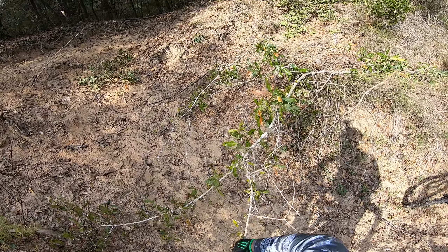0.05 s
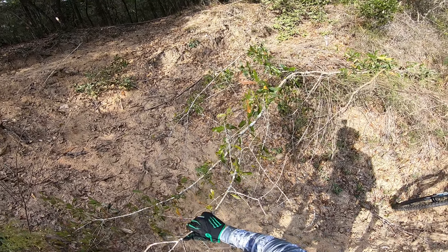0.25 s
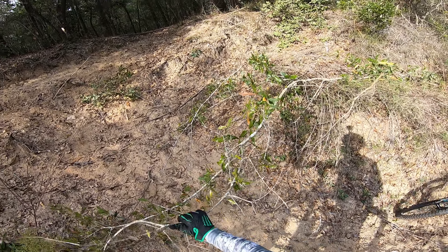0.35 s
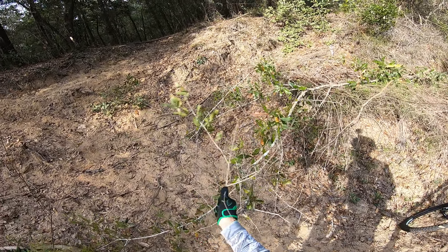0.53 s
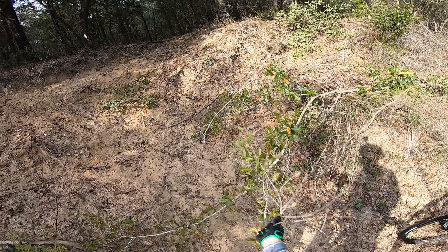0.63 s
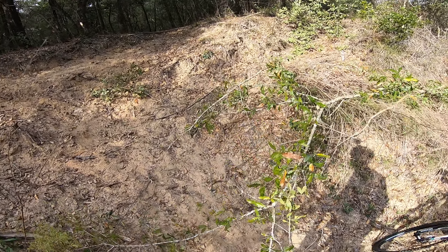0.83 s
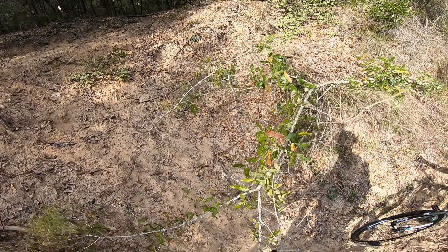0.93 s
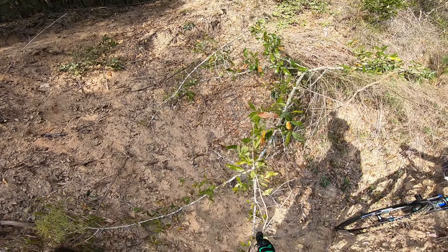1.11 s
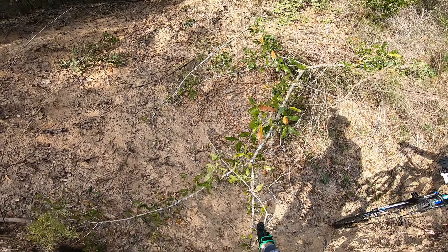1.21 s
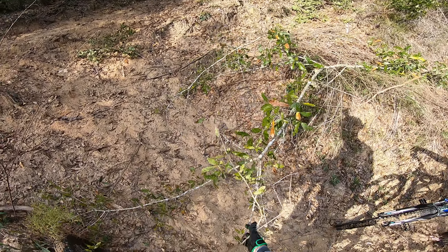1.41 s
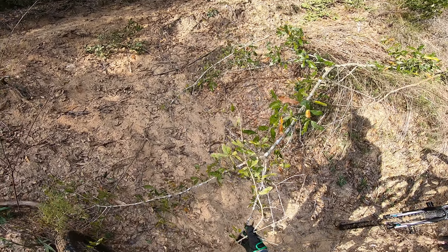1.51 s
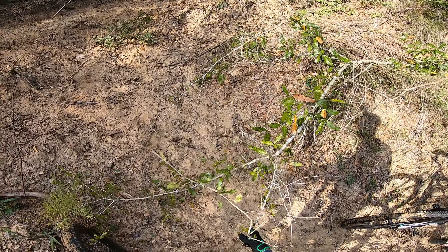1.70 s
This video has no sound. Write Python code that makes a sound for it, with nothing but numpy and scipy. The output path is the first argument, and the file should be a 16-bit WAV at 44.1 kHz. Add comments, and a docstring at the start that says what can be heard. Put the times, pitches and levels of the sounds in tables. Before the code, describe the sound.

A leafy branch rustles and crackles over dry dirt, with twigs snapping close by.

```python
"""A puff of wind and a dry rustle come first; then twigs snap and wood knocks and scuffs as a leafy
branch is swung, dropped and dragged over dry dirt, close to a body-worn camera outdoors.
Many tiny impacts add up to the crackle of leaves and grit; fractures and blows excite damped modes
of the wood. The microphone ports resonate near 7 kHz and give the leaves their edge, while eddies
of wind rumble, mostly in the right port."""
import sys
import numpy as np
from scipy import signal
from scipy.fft import rfft, irfft, next_fast_len
from scipy.io import wavfile
from scipy.ndimage import uniform_filter1d, map_coordinates

SR = 44100
rng = np.random.default_rng(int(sys.argv[2]) if len(sys.argv) > 2 else 0)


def wav_out(sig):
    """Save sig, one row per channel (or a flat mono array), as 16-bit PCM at SR to the path in sys.argv[1]."""
    wavfile.write(sys.argv[1], SR, np.round(np.clip(np.atleast_2d(sig).T, -1, 1) * 32767).astype(np.int16))


N = 77175
T = np.arange(N) / SR

# Envelope of the leaf rustle (time [s], level [dB])
RUSTLE_LEVEL = [(0, -53.5), (.13, -53), (.16, -44.5), (.23, -48), (.29, -47.5), (.37, -50), (.42, -44.5),
                (.45, -52), (.51, -48.5), (.57, -54.5), (.645, -50.5), (.665, -41), (.745, -46),
                (.83, -43.5), (.91, -44), (.97, -49), (1.005, -47), (1.04, -52), (1.08, -53), (1.11, -46.5),
                (1.14, -45.5), (1.165, -50.5), (1.205, -47), (1.3, -51.5), (1.4, -52.5), (1.46, -56.5),
                (1.51, -50), (1.58, -59.5), (1.75, -57.5)]
# Balance of the branch, always left minus right (time [s], balance [dB])
BRANCH_PAN = [(0, -4), (.3, -2.5), (.62, -2.5), (.8, -1), (1.05, -1), (1.25, -0.5), (1.42, -3.5),
              (1.75, 0.5)]
# Sprays of leaves slapping the ground (time [s], level [dB], rise time [s], balance [dB])
LEAF_SLAPS = [(0.153, -49, 0.0022, -6), (0.2985, -39, 0.003, -4), (0.341, -43, 0.0015, 4),
              (0.472, -43, 0.0034, -3), (0.658, -41.5, .004, 3), (0.6735, -39.5, 0.0016, -1),
              (0.86, -39.5, 0.0018, 7), (1.197, -38, 0.0025, 2), (1.612, -47, 0.0043, 0),
              (1.635, -43, 0.0059, -2)]
# Spectrum of leaf contacts (frequency [Hz], level [dB])
LEAF_SPECTRUM = [(300, -10.5), (1500, -18), (3000, -2.5), (4500, -3.5), (6000, 4.5), (8000, 3), (10500, -6),
                 (12500, -10), (15500, -14.5)]
# Twig fractures (time [s], level [dB], t60 [s], wood level [dB], ring frequency [Hz],
# ring level [dB], balance [dB])
TWIG_SNAPS = [(0.0937, -34.5, 0.0084, -19, 8500, 2, -4), (0.267, -27.5, 0.011, -27, 7500, -2.5, -5),
              (0.2848, -25.5, 0.0039, -19, 7700, 3, -5), (0.4104, -31.5, 0.0065, 10, 4400, -6, -10),
              (0.4166, -27, 0.0091, 0, 7300, -5, -4), (0.428, -37, 0.0037, 6, 6030, -9, 8),
              (0.4599, -27.5, 0.0087, -13.5, 9330, -2, 0.5), (0.6572, -27, 0.0082, 5, 7500, 1, -9),
              (.683, -29, 0.0036, -16, 5970, -11, -11), (0.7106, -32, .009, -12, 9050, -7, 5),
              (0.7193, -26.5, 0.0076, 1, 5850, -1, -4.5), (0.7656, -20, 0.0072, -3, 6880, 6, 4),
              (.8857, -32.5, 0.009, -7, 5560, 5, 2), (0.8992, -30.5, 0.01, -19, 7450, 1, 1),
              (0.9518, -36, 0.013, -21, 3500, -8, 2), (1.0057, -33.5, 0.018, -22, 6800, 7, 6),
              (1.6245, -38, 0.0052, -17, 5600, -10, 3), (1.6402, -33, 0.019, -15, 5600, -8, -3)]
# Spectrum of a fracture (frequency [Hz], level [dB])
CRACK_SPECTRUM = [(300, -4), (1500, -2.5), (4000, -1.5), (7000, 11.5), (10000, -6), (13000, -5.5),
                  (15500, -18)]
# Modes of a twig (frequency [Hz], bandwidth [Hz], level [dB])
TWIG_MODES = [(2000, 420, -15), (2710, 1500, 11.5), (3210, 200, 13.5)]
# Blows of the stick on the soil (time [s], level [dB], t60 [s], pitch [ratio])
STICK_KNOCKS = [(0.141, -33, 0.042, 0.974), (0.3014, -35.5, 0.031, 1.1), (0.3043, -31, 0.018, 1.96),
                (0.3965, -28, 0.028, 1.91), (0.6, -36.5, 0.022, 1.84), (0.674, -35, 0.011, 1.6)]
# Modes of the stick at a pitch ratio of 1 (frequency [Hz], bandwidth [Hz], level [dB])
STICK_MODES = [(595, 160, -3), (930, 360, -2), (1210, 210, 1), (1630, 110, -17.5)]
# Envelope of wood dragging on dirt (time [s], level [dB])
DRAG_LEVEL = [(0, -49), (.1, -57.5), (.17, -44.5), (.23, -51.5), (.3, -47), (.36, -51), (.42, -45.5),
              (.48, -56), (.63, -50.5), (.67, -47.5), (.77, -46.5), (.94, -50), (1.05, -55.5), (1.12, -53),
              (1.22, -52), (1.31, -56), (1.5, -57.5), (1.58, -57.5), (1.75, -55.5)]
# Spectrum of rolling grit (frequency [Hz], level [dB])
GRIT_SPECTRUM = [(100, -16), (250, -2), (500, 1), (800, -1), (1500, 1.5), (3000, 0), (4200, -8),
                 (7000, -34.5), (15000, -39)]
# Scuffs: first a slow low rub of a sleeve, then the stick on the soil (time [s], level [dB], rise time [s],
# centre frequency [Hz])
SCUFFS = [(.16, -56, 0.068, 330), (.286, -44.5, 0.0089, 1490), (0.863, -41.5, 0.003, 2425),
          (1.609, -55, 0.0062, 2360), (1.637, -50, 0.0052, 1460)]
# Port differences for sound from the ground (frequency [Hz], left phase lead [rad], balance [dB])
PORT_DIFFERENCES = [(200, 1.27, 5), (585, 1.54, 1.5), (1330, 1.7, 0.5), (2050, 1.18, 1), (4500, -0.6, 1),
                    (5700, -1.17, 2), (7660, -2, 2.5), (9200, -1.65, -4), (14700, -1.55, 3.5)]
# Envelope of the wind rumble (time [s], level [dB])
GUST_LEVEL = [(0, -33.5), (.04, -50), (.09, -40), (.125, -46), (.19, -42), (.225, -31), (.28, -41),
              (.315, -37.5), (.335, -25), (.36, -24), (.38, -41), (.42, -24.5), (.455, -48), (.49, -29),
              (.55, -38), (.585, -28.5), (.665, -30), (.7, -23), (.726, -22.5), (.75, -42.5), (.78, -21),
              (.825, -23.5), (.85, -40), (.89, -31.5), (.92, -45.5), (1, -34.5), (1.045, -51),
              (1.09, -43.5), (1.165, -50), (1.19, -37), (1.26, -36), (1.3, -56), (1.355, -37), (1.4, -60),
              (1.44, -58), (1.485, -39.5), (1.535, -56), (1.585, -40), (1.72, -47.5), (1.75, -59)]
# Spectrum of the turbulence (frequency [Hz], level [dB])
TURBULENCE_SPECTRUM = [(15, -3), (30, -7), (65, -6.5), (85, -7.5), (115, -20), (300, -61.5)]
# Envelope of the wind's flutter at 100-300 Hz (time [s], level [dB])
FLUTTER_ENVELOPE = [(0, -51), (.11, -66), (.21, -52.5), (.3, -48), (.37, -52), (.5, -53.5), (.6, -51),
                    (.76, -43.5), (.86, -53.5), (.96, -52), (1.04, -55.5), (1.1, -61), (1.2, -64),
                    (1.3, -55), (1.38, -64), (1.75, -63)]
# Spectrum of the flutter (frequency [Hz], level [dB])
FLUTTER_SPECTRUM = [(50, -19.5), (100, -2.5), (140, -2.5), (190, 1.5), (220, -7.5), (260, -10.5),
                    (330, -17), (700, -29.5), (3000, -42.5)]
# Spectrum of the quiet outdoor air (frequency [Hz], level [dB])
AIR_SPECTRUM = [(30, 5.5), (180, -5), (300, -17.5), (800, -12), (1500, -9), (2500, -13.5), (4000, -46),
                (8000, -17), (15000, -39)]

TREBLE_ALIKE, MID_ALIKE = 0.61, 0.78  # left-right correlation
STICK_PAN_DB, DRAG_PAN_DB, RUMBLE_PAN_DB, FLUTTER_PAN_DB, AIR_PAN_DB = -5.5, -3, -17.5, -7.5, -9.5
TOP_HZ = 15500


def leaves():
    """Superposition: countless leaf contacts merge into crackle and hiss, swelling at each slap."""
    def leaf_sound(excitation):
        return unit(port_resonance(colour(excitation, LEAF_SPECTRUM)))
    crackle = leaf_sound(grains(per_s=1200, spread_db=2, alike=TREBLE_ALIKE))
    hiss = leaf_sound(stereo_noise(TREBLE_ALIKE))
    ticks = leaf_sound(leaf_ticks())
    flicker_db = wobble(per_s=76)
    level = amp(curve(RUSTLE_LEVEL) + flicker_db) * pan(curve(BRANCH_PAN))
    rustle = level * (amp(-2.5) * crackle + amp(-1.5) * hiss + amp(-9) * ticks)
    slaps = sum(amp(db) * swell(start, rise) * pan(side) for start, db, rise, side in LEAF_SLAPS)
    spray = leaf_sound(grains(per_s=6600, spread_db=3, alike=TREBLE_ALIKE))
    return shifting_colour(rustle + slaps * spray)


def leaf_ticks(per_s=650, median_hz=6060, spread_octaves=0.66, decay_cycles=3.7, spread_db=5):
    """Free vibration: each flicked leaf is a damped sinusoid with its own pitch and direction."""
    count = int(per_s * N / SR)
    when, pitch, strength, side, lag = rng.random((4096, 5))[:count].T[:, :, None]
    octaves = spread_octaves * np.log(pitch / (1 - pitch)) / 2
    hz = np.minimum(median_hz * 2 ** octaves, TOP_HZ)
    cycles = hz * np.arange(256) / SR
    fade = amp(spread_db * np.minimum(-np.log(strength), 3)) * np.exp(-cycles / decay_cycles)
    samples = (when * N).astype(int) + np.arange(256)
    channels = []
    for sign in (1, -1):  # left, right
        ticks = (1 + sign * (side - .5)) * fade * np.sin(2 * np.pi * cycles + sign * (lag - .5))
        channels.append(np.bincount(samples.ravel(), ticks.ravel(), N)[:N])
    return unit(np.array(channels))


def twig_snaps(ring_width_hz=840, tail_db=-35.5, tail_t60=0.32):
    """Impulse excitation: a crack rings its twig briefly, and ground scattering leaves a faint tail."""
    out, t = np.zeros((2, N)), np.arange(4096) / SR
    for start, db, t60, wood_db, ring_hz, ring_db, side in TWIG_SNAPS:
        fade = amp(-60 * t / t60) + amp(tail_db - 60 * t / tail_t60)
        burst = np.tanh(2 * stereo_noise(TREBLE_ALIKE, size=len(t))) * fade
        crack = unit(colour(burst, CRACK_SPECTRUM))
        ring = unit(filtered(burst, lambda f: resonance(f, ring_hz, ring_width_hz) ** 2))
        wood = unit(filtered(burst, lambda f: modes(f, TWIG_MODES)))
        snap = unit(crack + amp(ring_db) * ring + amp(wood_db) * wood)
        fade_rms = np.sqrt(np.mean(fade ** 2))
        add(out, start, amp(db) * fade_rms * snap * pan(side))
    return out


def stick_knocks(rise_s=0.0005):
    """Modal ringing: the stick strikes the soil and dies away fast; a thinner part rings higher."""
    out = np.zeros((2, N))
    for start, db, t60, pitch in STICK_KNOCKS:
        def response(f):
            return modes(f / pitch, STICK_MODES) * resonance(f / pitch, hz=1005, width=1450) ** 2
        t = np.maximum(T - start, 0)
        fade = (1 - np.exp(-t / rise_s)) * amp(-60 * t / t60)
        ring = unit(filtered(stereo_noise(MID_ALIKE), response))
        out += amp(db) * fade * unit(np.tanh(ring))
    return out * pan(STICK_PAN_DB)


def dirt_drag(flicker_db=2.58):
    """Friction: grit rolls under the dragged wood; harder pushes scuff in one broad resonance, and a sleeve
    rubs once, low."""
    grit = unit(colour(grains(per_s=3500, spread_db=1, alike=MID_ALIKE), GRIT_SPECTRUM))
    level = amp(curve(DRAG_LEVEL) - 1.5 + flicker_db * wobble(per_s=39.94))
    out = level * grit * pan(curve(BRANCH_PAN) + DRAG_PAN_DB)
    rub = stereo_noise(MID_ALIKE)
    for start, db, rise, hz in SCUFFS:
        scuff = unit(filtered(rub, lambda f: resonance(f, hz, 0.67 * hz) * resonance(f, hz, 2 * hz)))
        out += amp(db) * swell(start, rise) * scuff * pan(STICK_PAN_DB)
    return shifting_colour(out)


def tip_scrape():
    """Resonance: twig tips catch on the soil and ring in one narrow band as the leaves move."""
    catches = grains(per_s=450, spread_db=4, alike=MID_ALIKE)
    ring = unit(filtered(catches, lambda f: resonance(f, hz=3070, width=450)))
    return amp(curve(RUSTLE_LEVEL) - 15) * ring * pan(curve(BRANCH_PAN))


def wind(eddy_hz=53.2, wander_octaves=0.246, left_lead_rad=1, cutoff_hz=78.6):
    """Vortex shedding: uneven eddies rumble out of step at the two ports, under a lighter flutter."""
    hz = eddy_hz * 2 ** (wander_octaves * wobble(per_s=91))
    phase = 2 * np.pi * np.cumsum(hz) / SR
    eddies = unit(np.sin([phase + left_lead_rad, phase]))
    turbulence = unit(colour(stereo_noise(alike=0.6), TURBULENCE_SPECTRUM))
    gusts = amp(curve(GUST_LEVEL) - 4) * (eddies + amp(-3.5) * turbulence)
    rumble = low_pass(gusts, cutoff_hz, order=6)
    flutter = amp(curve(FLUTTER_ENVELOPE)) * unit(colour(stereo_noise(alike=0.24), FLUTTER_SPECTRUM))
    return rumble * pan(RUMBLE_PAN_DB) + flutter * pan(FLUTTER_PAN_DB)


def quiet_air():
    """Ambient noise: a faint steady hush, only weakly correlated between the ports."""
    return amp(-58.5) * unit(colour(stereo_noise(alike=0.2), AIR_SPECTRUM)) * pan(AIR_PAN_DB)


def port_resonance(x):
    """Resonance of the microphone ports adds a short bright ring."""
    return filtered(x, lambda f: 1 + amp(-5.5) * resonance(f, hz=7180, width=1600))


def port_directivity(x):
    """Directivity: the ports face different ways, so phase and level differ between them."""
    hz, lead, side_db = np.transpose(PORT_DIFFERENCES)
    def response(f):
        phase_shift = np.exp(np.array([[.5j], [-.5j]]) * np.interp(f, hz, lead))
        return pan(np.interp(f, hz, side_db)) * phase_shift
    return filtered(x, response)


def shifting_colour(x, depth_db=2):
    """Spectral modulation: the timbre shifts at random as different contacts take their turn."""
    spectra = signal.stft(x, nperseg=256)[2]
    patches = rng.standard_normal(spectra.shape[1:])
    patches = uniform_filter1d(patches, size=5, axis=0)  # smooth over frequency
    patches = uniform_filter1d(patches, size=6, axis=1)  # and over time
    return signal.istft(spectra * amp(depth_db * unit(patches)), nperseg=256)[1][:, :N]


def grains(per_s, spread_db, alike):
    """Shot noise: tiny contacts at random times, many faint and a few strong."""
    strength = amp(spread_db * np.minimum(rng.exponential(size=N), 4))
    contacts = rng.random(N) < per_s / SR
    return contacts * strength * np.tanh(stereo_noise(alike))


def stereo_noise(alike, size=N):
    """Partial coherence: two white noises share the fraction alike of their power."""
    noise = rng.standard_normal((3, size))
    return np.sqrt(alike) * noise[0] + np.sqrt(1 - alike) * noise[1:]


def swell(start, rise):
    """A critically damped pulse: it peaks after rise seconds and fades more slowly."""
    u = np.maximum(T - start, 0) / rise
    return u * np.exp(1 - u)


def wobble(per_s):
    """Spline interpolation of per_s random values a second."""
    return map_coordinates(rng.standard_normal(2048), [T * per_s], mode="wrap")


def resonance(f, hz, width):
    """Band-pass response of a damped oscillator; width is its bandwidth in Hz."""
    return 1j * f * width / (hz * hz - f * f + 1j * f * width)


def modes(f, rows):
    """Modal superposition: a body responds with the sum of its resonances."""
    return sum(amp(db) * resonance(f, hz, width) for hz, width, db in rows)


def filtered(x, response):
    """Linear filtering: the spectrum of x times a frequency response."""
    n = x.shape[-1]
    padded = next_fast_len(n + 4096)
    return irfft(rfft(x, padded) * response(np.fft.rfftfreq(padded, 1 / SR)), padded)[..., :n]


def colour(x, spectrum):
    """Minimum-phase filtering through (frequency [Hz], level [dB]) points."""
    def response(f):
        hz, db = np.transpose(spectrum)
        gain = amp(np.interp(np.log(f + 1), np.log(hz + 1), db))
        cepstrum = irfft(np.log(gain))
        half = len(cepstrum) // 2
        cepstrum[1:half] *= 2  # folding onto positive time makes the filter causal
        cepstrum[half + 1:] = 0
        return np.exp(rfft(cepstrum))
    return filtered(x, response)


def low_pass(x, hz, order):
    """Zero-phase filtering, maximally flat below the cutoff."""
    return filtered(x, lambda f: 1 / np.sqrt(1 + (f / hz) ** (2 * order)))


def amp(db):
    """Decibels to amplitude ratio."""
    return 10 ** (np.asarray(db) / 20)


def unit(x):
    """Normalisation to rms 1."""
    return x / np.sqrt(np.mean(x ** 2) + 1e-20)


def curve(rows):
    """Linear interpolation of (time [s], value) rows at every sample."""
    return np.interp(T, *np.transpose(rows))


def pan(db):
    """Left and right gains for a level difference."""
    return amp(np.array([[.5], [-.5]]) * db)


def add(out, start, x):
    """Superpose x on out from start seconds."""
    i = round(start * SR)
    out[:, i:i + x.shape[1]] += x[:, :N - i]


def scene():
    """Superposition of the branch, as the two ports receive it, with the wind and the quiet air."""
    air = quiet_air()
    branch = leaves() + dirt_drag() + tip_scrape() + stick_knocks() + twig_snaps()
    return port_directivity(branch) + wind() + air


def record(dry):
    """Band limiting: the camera cuts off steeply above its top frequency."""
    return low_pass(dry, TOP_HZ, order=80)


dry = scene()
out = record(dry)
wav_out(out)
```